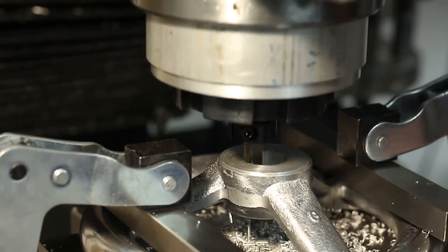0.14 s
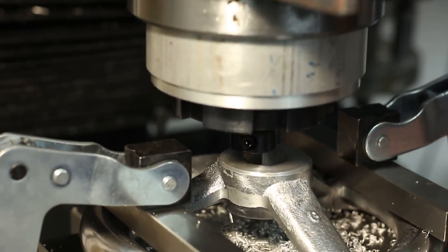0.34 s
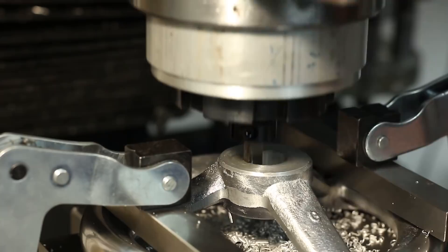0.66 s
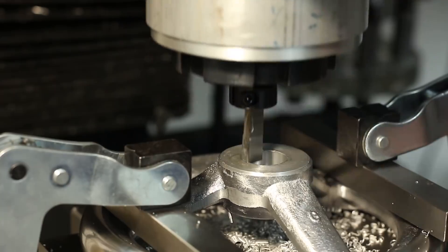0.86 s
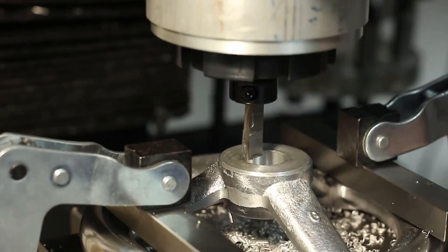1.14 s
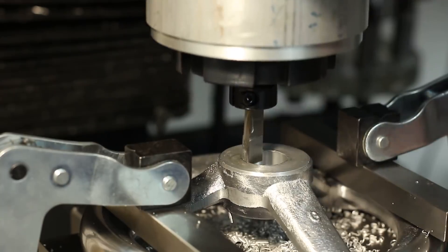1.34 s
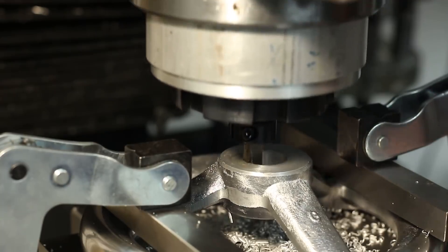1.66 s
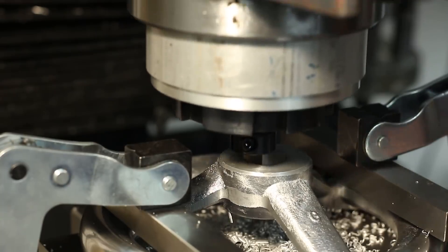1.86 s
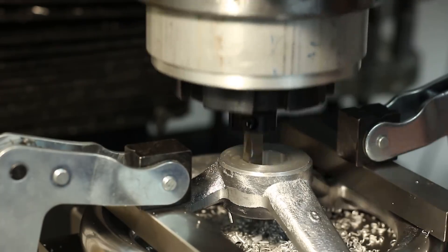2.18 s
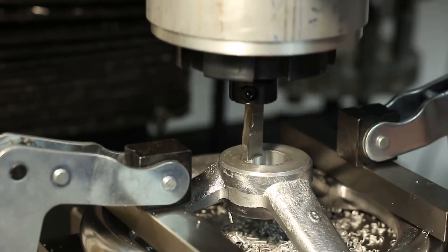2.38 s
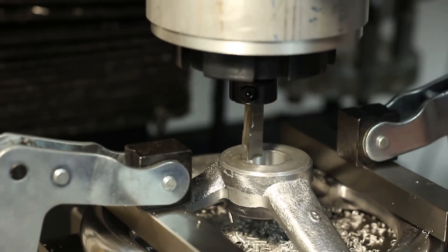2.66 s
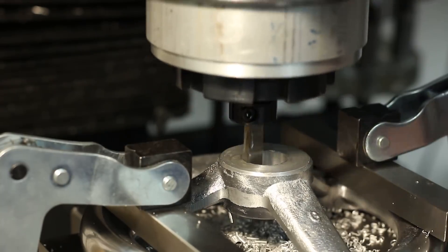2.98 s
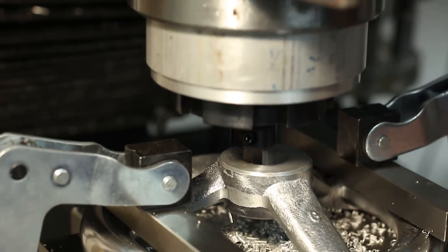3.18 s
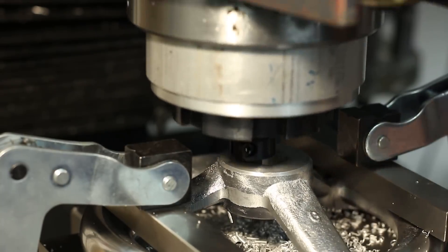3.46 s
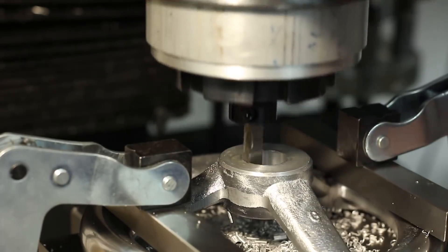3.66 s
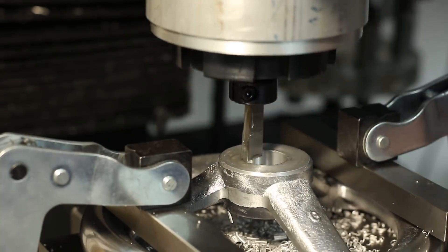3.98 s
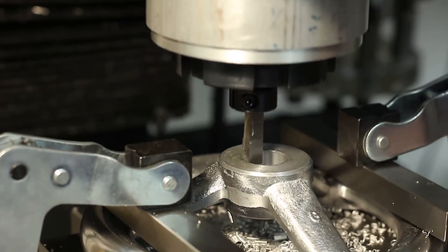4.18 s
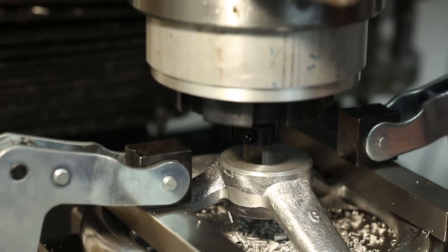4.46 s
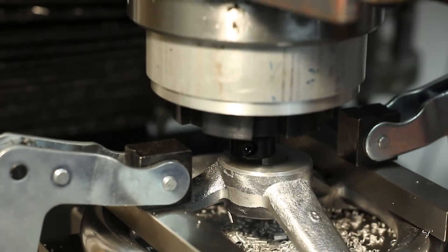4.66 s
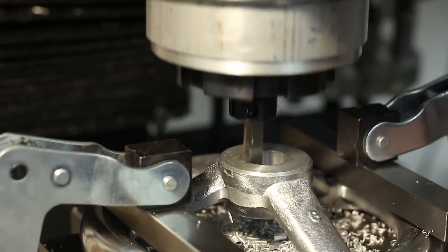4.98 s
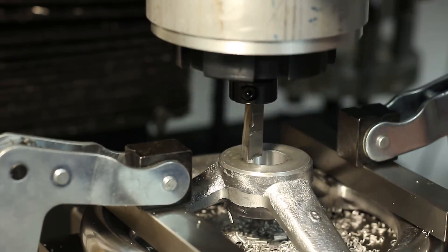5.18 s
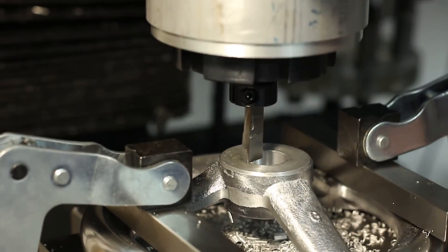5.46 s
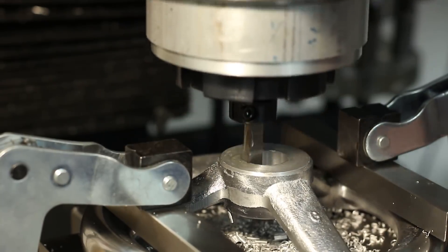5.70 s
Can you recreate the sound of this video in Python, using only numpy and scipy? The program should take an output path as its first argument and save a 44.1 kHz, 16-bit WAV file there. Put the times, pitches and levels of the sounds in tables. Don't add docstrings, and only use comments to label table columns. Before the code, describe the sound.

Close steel knocks come in repeated groups as a cutter bites, turns and springs free, joined by faint high metallic sliding and tiny chip ticks.

```python
import sys
import numpy as np
from scipy import signal
from scipy.fft import rfft, irfft, next_fast_len
from scipy.io import wavfile
from scipy.ndimage import uniform_filter1d, map_coordinates

SR = 44100
rng = np.random.default_rng(int(sys.argv[2]) if len(sys.argv) > 2 else 0)


def field_ratio(decibels):
    return 10 ** (np.asarray(decibels, dtype=float) / 20)


def store_pcm(level_fs):
    pcm = np.round(np.clip(level_fs, -1, 1) * 32767).astype(np.int16)
    wavfile.write(sys.argv[1], SR, np.atleast_2d(pcm).T)


N = 257087
SPAN = 2 ** 14
TOP_HZ = 15830

# full_speed_s, effort_db, speeding_up_s, slowing_down_s
FREE_STROKES = [
    (0.13, -53.5, 0.43, 0.2),
    (1.645, -54.5, 0.31, 0.27),
    (3.15, -54.5, 0.33, 0.32),
    (4.43, -50.5, 0.21, 0.24),
    (5.84, -56, 0.26, 0.22),
]
CUTTING_STROKES = [
    (0.8, -67.5, 0.15, 0.19),
    (2.27, -67.5, 0.08, 0.14),
    (3.68, -69, 0.11, 0.21),
    (4.98, -63, 0.045, 0.14),
]
# over_effort_db, lost_at_ends_db, bluntness (exponent), lag_s
FREE_LAWS = [(0.46, 25.5, 1.234, 0.0015), (-3, 24.5, 0.81, -0.0031), (-14, 15, 1.3, 0.02),
             (3, 6.5, 1.6, -0.0019)]
CUTTING_LAWS = [(0.6, 3, 1.8, -0.11), (-0.5, 15, 2.1, 0.028), (-1.5, 11, 1.4, -0.099),
                (3.5, 17, 0.73, -0.16)]
# pitch_hz, width_hz, level_db
QUILL_MODES = [(1490, 40, -7), (1930, 130, -8.5), (2680, 66, -9.5), (3910, 89, -3.5), (4150, 24, -3),
               (5000, 180, -9), (5170, 240, -4), (5630, 24.5, -10), (6004, 33, 6), (5570, 41, 0),
               (6750, 58, -10.5), (7570, 191, -7), (8460, 90, -6.5), (8810, 61.3, -6)]
# pitch_hz, level_db
SCRAPE_SPECTRUM = [(300, -40), (600, -8.5), (950, -16), (1150, -22), (2500, -27), (4000, -11.5),
                   (6000, -57), (9000, -14.5), (9800, -43.5)]
# pitch_hz, width_hz
SINGING_MODES = [(6070, 55), (8450, 65)]
# pitch_hz, width_hz, level_db
WHISTLE_MODES = [(4185, 64, -7.5), (7570, 90, -13.5), (7040, 38, -17.5), (610, 68, -17.5), (950, 50, -19),
                 (1416, 34, -16.5), (3770, 150, -12)]
# pitch_hz, width_hz, level_db
RUMBLE_MODES = [(104.7, 4.3, 7), (145, 61, -17), (176, 9.7, 2.5), (233, 35, -8), (312, 51, -15.5)]

# start_s, peak_db, centre_hz
LOW_TICKS = [(0.2318, -42.5, 8450), (0.4323, -36, 8860), (0.6729, -37, 5990), (0.9878, -32.5, 8750),
             (1.2989, -42, 8220), (1.4356, -49.5, 8310), (1.484, -44, 8460), (1.7347, -39.5, 5760),
             (2.1542, -44.5, 6140), (2.728, -53, 5700), (2.9093, -42.5, 7540), (3.3707, -43.5, 8420),
             (4.6329, -38, 6175), (4.6673, -45.5, 8380), (5.4328, -44.5, 7870), (3.568, -44, 8360)]
HIGH_TICKS = [(0.4285, -42.5, 11860), (.575, -39, 11490), (1.8285, -38.5, 14280), (1.829, -41.5, 11970),
              (1.83, -44.5, 10870), (1.897, -54, 11000), (2.455, -38, 13800), (3.2357, -50.5, 12750),
              (3.262, -43, 11600), (3.284, -46.5, 11600), (4.0515, -51.5, 13200), (4.3888, -47.5, 13230),
              (4.4172, -35.5, 13820), (4.4516, -39.5, 13360), (4.5585, -55, 12400), (4.6319, -40.5, 12900),
              (5.1903, -68, 10900), (5.435, -45.5, 14180), (5.8224, -31.5, 13840)]

# start_s, peak_db, place (0 column, 1 table, 2 head), push_ms
FRAME_PUSHES = [(0.479, -46.5, 0.1, 30), (0.576, -22.5, 1.52, 8.2), (0.773, -31.5, 1.13, 17.6),
                (0.993, -18, 1.63, 15), (1.16, -40, 2.66, 4.1), (1.342, -29, 1.02, 11),
                (1.364, -24, 1.12, 9.1), (2.059, -27, 1.04, 7.5), (2.188, -28.5, 1.44, 71),
                (2.457, -21.5, 1.46, 12), (2.687, -39.5, 1.7, 7.3), (2.792, -33, 0.94, 3.4),
                (2.813, -23.5, 1.26, 11.4), (3.112, -43, .45, 17), (3.372, -60, 0.046, 12),
                (3.482, -20, 1.6, 17.5), (3.887, -17.5, 1.57, 13.6), (4.03, -33, 2.16, 12),
                (4.087, -35.5, .05, 7.9), (4.121, -27, 1.02, 22), (4.284, -46, 0.45, 12),
                (4.412, -49, 0.18, 25), (4.671, -42, 0.08, 10.5), (4.806, -22, 1.26, 9.8),
                (4.852, -22, 2.28, 14), (5.183, -20.5, 1.73, 14), (5.42, -29.5, 0.96, 42),
                (5.484, -30.5, 1.44, 5.8), (5.511, -27.5, 0.89, 7.2), (5.766, -45, 0.18, 13)]
# pitch_hz, level_db, t60_s
COLUMN_MODES = [(33.5, -19.5, 0.94), (63.6, -18.5, 0.34), (101.84, 3.5, 0.3), (108, -4, 0.72),
                (147.7, 1, 0.39)]
TABLE_MODES = [(186.2, 4, 0.23), (200.6, -14.5, 0.56), (225.4, -3.5, 0.18)]
HEAD_MODES = [(264, -0.5, 0.11), (311.5, -9.5, 0.25), (358, 4, 0.096), (428, -7, 0.21), (470.5, -22, 0.44),
              (549, -14.5, 0.08), (642, -24, .12), (686.4, -24.5, 0.083)]
REACH_DB = 8
# pitch_hz, level_db (per Hz)
COVER_SPECTRUM = [(60, -64), (120, -29), (200, -4), (300, 7), (420, 5.5), (520, -3), (700, -36.5),
                  (1500, -120)]

# start_s, peak_db, bright_share_db, rattle_ms, loudest_mode_hz
CUTTER_BITES = [
    (0.572, -4.5, -10.5, 11.7, 3020),
    (2.0575, -10, -21.5, 13.6, 1815),
    (3.4797, -9, -23, 11.2, 3040),
    (4.8053, -20.5, -25.5, 12, 1634),
    (4.812, -20, -22, 6.8, 1580),
    (5.179, -16, -17, 30, 1800),
    (5.19, -7, -12.5, 5.5, 1800),
]
STROKE_CLUNKS = [
    (0.992, -20, -14.5, 11, 1720),
    (2.455, -18.5, -17, 9.4, 1140),
    (3.884, -15.5, -11, 8.7, 1505),
    (4.84, -26.5, -7.5, 9.5, 1120),
]
CUTTER_RELEASES = [
    (1.3555, -12.5, -20.5, 9.4, 2920),
    (2.8085, -12, -19.5, 8.7, 2800),
    (4.1215, -19.5, -26, 14, 2740),
    (5.505, -16.5, -29, 7.6, 2800),
]
SOFT_TAPS = [
    (0.7505, -37.5, -20, 29, 1130),
    (2.55, -41, -30, 14, 1400),
    (2.182, -33, -12, 7.2, 1130),
    (2.514, -32, -29, 16, 1340),
    (4.043, -30.5, -21, 11, 1800),
    (5.472, -40.5, 7.5, 24, 1810),
]
CRISP_TAPS = [
    (1.155, -31, -30, 7.2, 3900),
    (2.676, -42.5, -21.5, 16, 2700),
    (3.371, -50.5, -10, 6.2, 3500),
    (4.0245, -27.5, -14, 10, 4100),
    (4.051, -33, -7, 8.9, 4780),
    (5.394, -42, -48, 20, 4100),
    (5.431, -40.5, -1, 14, 3000),
]
# start_s, peak_db, swell_ms, loudest_mode_hz
BACKLASH = [
    (.535, -38.5, 77, 3020),
    (0.954, -41.5, 32.5, 1550),
    (1.325, -33.5, 15.7, 5950),
    (2.031, -48.5, 23.6, 6080),
    (2.429, -36.5, 47, 5700),
    (2.776, -35, 13, 3970),
    (3.449, -35.5, 79, 1920),
    (3.856, -34.5, 41, 2160),
    (5.152, -36, 30, 2970),
]
# after_touch_ms, level_db, pitch_hz, cycles_to_peak
BITE_KNOCKS = [(.1, -12, 970, 0.46), (1.2, -3.5, 3100, 0.58), (3, -7, 1600, 0.35), (4.8, -10.5, 3050, 1.1),
               (5, -14, 6100, 2.1), (6.6, -10.5, 2200, 0.86), (8.4, -10.5, 4500, 4.5),
               (10.2, -11.5, 2700, 1.5), (12.5, -15, 1400, 0.38)]
CLUNK_KNOCKS = [(.6, -8.5, 3200, 0.66), (2.4, -2.5, 2870, 0.85), (3.8, -8, 1520, 1.22), (5.4, -8, 4040, 3),
                (7.2, -9, 1030, 0.73)]
RELEASE_KNOCKS = [(.7, -6, 2750, 0.54), (1.9, -8.5, 1770, 0.38), (3.4, -1.5, 2830, 0.77),
                  (4.8, -6.5, 883, 0.88), (6.4, -7.5, 1750, 1.33), (10.4, -23.5, 1500, 1.2)]
CRISP_KNOCKS = [(0.24, -10.5, 4040, 7.7), (.8, -9, 1570, 1.8), (0.41, -12.5, 3210, 6.7),
                (3.2, -11.5, 2700, 2.5), (5.2, -15, 2600, 3.8)]
SOFT_KNOCKS = [(2, -15, 1090, 4.9)]
# pitch_hz, width_hz, level_db
BITE_MODES = [(688, 38, -2), (1130, 24, 4), (1525, 54, -8), (2120, 15, -6.5), (2365, 20, -11.5),
              (2670, 62, -1), (3093, 62, -2), (3800, 110, -4.5), (4210, 19, -12), (4610, 85, -11),
              (5360, 76, -12), (5760, 110, -14), (6250, 130, -18.5), (6590, 29, -18)]
CLUNK_MODES = [(680, 47, 3), (1147, 31, 7.5), (1526, 39, -0.5), (1400, 50, 6), (2695, 41, -2.5),
               (3610, 19, -23), (4160, 30, -18), (5300, 77, -27), (5700, 130, -23), (7500, 188, -36)]
RELEASE_MODES = [(687, 130, -9), (915, 140, 0.5), (1150, 48, 3.5), (1580, 20, 1.5), (2015, 29, -11),
                 (2330, 15, -3), (2367, 35, -6), (2634, 61, 6), (2990, 61, -3), (3270, 65, 1),
                 (4100, 37, -17), (5740, 210, 8)]
# pitch_hz, level_db (per Hz)
BLOW_SPECTRUM = [(300, -19.5), (450, -1.5), (1600, 1), (3000, -1), (4100, 1), (6300, -10.5), (8800, -19),
                 (9800, -34.5), (14000, -52)]

# start_s, level_db, first_mode_hz, t60_s
HOUSING_BOOMS = [(0.579, -33, 301, .2), (.994, -21.5, 356.7, .17), (2.06, -27, 284.2, .2),
                 (2.456, -24.5, 355.3, .17), (2.679, -45.5, 342, .15), (3.485, -30, 328.7, .2),
                 (3.885, -21.5, 354, .17), (4.026, -47, 380, .12), (4.82, -29.5, 343, .15),
                 (4.845, -29, 368.4, .25), (5.19, -39, 355.7, .17), (5.395, -47, 354, .15),
                 (5.508, -30.5, 200, .2)]
# pitch_ratio (to the first mode), level_db
HOUSING_MODES = [(1.001, 0.2), (1.1, -5), (0.97, -6.5), (1.5, -14.5)]

# peak_s, level_db, swell_s, fade_s
BINDINGS = [
    (1.71, -52, .03, 0.045),
    (3.17, -60.5, 0.11, 0.12),
]
# pitch_hz, width_hz, level_db
GROAN_MODE = [(1339, 110, 0)]

# peak_s, level_db, swell_s, fade_s
CHIP_FIZZ = [
    (3.275, -55.5, 0.06, 0.033),
    (4.42, -51, 0.023, 0.071),
    (4.644, -65, .03, 0.053),
    (5.83, -55.5, 0.027, .05),
]
# over_effort_db, lost_at_ends_db, bluntness (exponent), lag_s
CRUSH_LAW = (.1, 24, 0.76, 0.0012)

# pitch_hz, t60_s
SHOP_DECAY = [(300, 0.28), (1100, 0.26), (3000, 0.26), (8000, 0.18)]
# pitch_hz, level_db (per Hz)
ROOM_SPECTRUM = [(20, -28.5), (36, -2.5), (55, -7.5), (190, -2.5), (300, -33.5), (430, -17.5), (900, -17),
                 (1700, -29), (3000, -30.5), (5800, -47.5), (15800, -49)]
# pitch_hz, level_db
SIDE_SPECTRUM = [(100, -47.5), (500, -30), (1500, -27.5), (4000, -21.5), (9000, -13), (15000, -14.5)]
# pitch_hz, level_db
PORT_SPECTRUM = [(30, -66.5), (100, -72), (300, -79), (1000, -83.5), (4000, -83), (9000, -86.5),
                 (15000, -89.5)]


def unit(x):
    return x / np.sqrt(np.mean(x ** 2) + 1e-20)


def along(points, hz):
    f, v = np.transpose(points)
    return np.interp(np.log(hz + 1), np.log(f + 1), v)


def wobble(rate):
    coarse = np.arange(0, N + 16, 16)
    knots = rng.standard_normal(int(N * rate / SR) + 4)
    return np.interp(np.arange(N), coarse, map_coordinates(knots, [coarse * rate / SR]))


def filtered(x, response):
    m = next_fast_len(x.shape[-1] + SR // 8)
    spectrum = rfft(x, m) * response(np.fft.rfftfreq(m, 1 / SR))
    return irfft(spectrum, m)[..., :x.shape[-1]]


def modes(peaks, f):
    total = 0
    for k, (c, w, db) in enumerate(peaks):
        total = total + (-1) ** k * field_ratio(db) * 1j * f * w / (c * c - f * f + 1j * f * w)
    return total


def causal(gain):
    cepstrum = irfft(np.log(gain + 1e-6))
    cepstrum[1:len(cepstrum) // 2] *= 2
    cepstrum[len(cepstrum) // 2 + 1:] = 0
    return np.exp(rfft(cepstrum))


def noise(response):
    return unit(filtered(rng.standard_normal(N), response))


def add(track, s, sound):
    part = track[round(s * SR):][:len(sound)]
    part += sound[:len(part)]


def shop(x, wet_db):
    hz, t, z = signal.stft(rng.standard_normal(len(x)), SR, nperseg=256)
    decay = field_ratio(-60 * t / along(SHOP_DECAY, hz)[:, None])
    tail = signal.istft(z * decay, SR, nperseg=256)[1]
    tail = np.pad(tail / np.linalg.norm(tail), (130, 0))
    return field_ratio(wet_db) * signal.fftconvolve(x, tail)[:len(x)]


def follow(strokes, over_db, lost_db, bluntness, lag):
    s, db, rise, fall = np.transpose(strokes)[:, :, None]
    late = np.arange(N) / SR - s - lag
    away = np.abs(late / np.where(late < 0, rise, fall))
    return field_ratio(db + over_db - lost_db * away ** bluntness).sum(axis=0)


def room_tone():
    return field_ratio(-65.5) * noise(lambda f: field_ratio(along(ROOM_SPECTRUM, f)))


def slide():
    scrape, *singing, rumble = (follow(FREE_STROKES, *free) + follow(CUTTING_STROKES, *cut)
                                for free, cut in zip(FREE_LAWS, CUTTING_LAWS))
    grain = field_ratio(0.42 * wobble(60) + 2.8 * wobble(400))
    body = unit(filtered(grain * rng.standard_normal(N),
                         lambda f: modes(QUILL_MODES, f) + field_ratio(along(SCRAPE_SPECTRUM, f))))
    songs = np.zeros(N)
    for (hz, width), level in zip(SINGING_MODES, singing):
        fits = field_ratio(2.5 * wobble(27) + 1.5 * wobble(4.6))
        songs += level * fits * noise(lambda f: modes([(hz, width, 0)], f) ** 2)
    whistles = np.zeros(N)
    for hz, width, db in WHISTLE_MODES:
        whistles += field_ratio(db + 2.2 * wobble(35)) * noise(lambda f: modes([(hz, width, 0)], f) ** 2)
    shudder = (rumble + field_ratio(-69)) * field_ratio(2.5 * wobble(15))
    frame = shudder * noise(lambda f: modes(RUMBLE_MODES, f))
    return field_ratio(3.5) * scrape * (body + whistles) + field_ratio(4.0) * songs + frame


def ticks():
    track, t = np.zeros(N), np.arange(SPAN // 4) / SR
    kinds = [(LOW_TICKS, 14, -8, .3, 18), (HIGH_TICKS, 3, -1.5, .29, 25)]
    for rows, quill_db, air_db, spread_octaves, t60_ms in kinds:
        for s, db, hz in rows:
            octaves = spread_octaves * np.append(0, rng.uniform(-1, .15, size=4))
            tones = np.minimum(hz * 2 ** octaves, 14550)
            ring = np.sin(2 * np.pi * tones[:, None] * t).T @ field_ratio([-2.0, -32.5, -16, -11.5, -15.0])
            ring *= field_ratio(-60 * t / (t60_ms / 1000))
            click = 0.21 * np.diff(rng.standard_normal(len(t) + 1)) * field_ratio(-60 * t / 0.045)
            tick = (ring + field_ratio(air_db) * click) * np.minimum(t / 0.00052, 1)
            tick += field_ratio(quill_db) * filtered(click, lambda f: modes(QUILL_MODES, f))
            add(track, s - .001, field_ratio(db) * (tick + shop(tick, wet_db=-8.0)) / np.abs(tick).max())
    return track


def thuds():
    track, t = np.zeros(N), np.arange(3 * SPAN // 4) / SR
    for s, db, place, ms in FRAME_PUSHES:
        ring, parts_db = np.zeros(len(t)), -REACH_DB * np.abs(np.arange(3) - place)
        for part, part_db, flutter_db in zip((COLUMN_MODES, TABLE_MODES, HEAD_MODES), parts_db, (1, 1, 3)):
            for hz, level, t60 in part:
                turn, smear, detune = rng.random(), rng.normal(0, 1.2), rng.normal(1, .012)
                knots = np.linspace(0, t[-1], num=14)
                flutter = flutter_db * np.interp(t, knots, rng.standard_normal(size=14))
                envelope = field_ratio(part_db + level + smear + flutter - 60 * t / t60)
                ring += envelope * np.sin(2 * np.pi * (hz * detune * t + turn))
        ring *= np.tanh(t / (max(ms, 1) / 1000))
        add(track, s - .002, field_ratio(db - 0.5) * (ring + shop(ring, wet_db=-6.0)))
    return track


def covers():
    place, t60_s = 2.02, 0.33
    shake, t = np.zeros(N), np.arange(SPAN) / SR
    for s, db, push_place, ms in FRAME_PUSHES:
        reach_db = -REACH_DB * abs(place - push_place)
        add(shake, s, field_ratio(db + reach_db - 60 * t / t60_s) * np.tanh(1000 * t / max(ms, 1)))
    return field_ratio(-10) * shake * noise(lambda f: field_ratio(along(COVER_SPECTRUM, f)))


def chatter(rows, t):
    ms, db, hz, cycles = np.transpose(rows)[:, :, None]
    chance = rng.standard_normal((len(rows), 2, 1))
    turns = np.maximum(t[:2048] - ms / 1000, 0) * hz * (1 + .03 * chance[:, 0])
    rise = turns / np.maximum(cycles, .3)
    bursts = field_ratio(db + 1.5 * chance[:, 1]) * rise * np.exp(1 - rise) * np.sin(2 * np.pi * turns)
    return np.pad(bursts.sum(axis=0), (0, len(t) - 2048))


def struck_steel(run, steel):
    free = [(hz * rng.normal(1, .008), 0.8 * width, db + rng.normal(0, 3)) for hz, width, db in steel]
    return run + field_ratio(-6) * filtered(run, lambda f: modes(free, f))


def contact(swell, steel, accent_db, low_db, bright_db, accent_hz):
    clumps = field_ratio(0.97 * unit(uniform_filter1d(rng.standard_normal(len(swell)), size=50)))
    rattle = swell * clumps * rng.standard_normal(len(swell))
    blow = np.linalg.norm(rattle) * (np.arange(len(swell)) == np.argmax(swell))
    struck = [(hz, width, level + rng.normal(0, 1.5)) for hz, width, level in steel]
    widened = [(hz, 2.4 * width, level) for hz, width, level in struck]
    tilt = [(1200, low_db + 15.5), (3000, 0.0081), (6500, bright_db + 15.5)]  # (Hz, dB)

    def colour(f):
        return causal(field_ratio(along(BLOW_SPECTRUM, f) + along(tilt, f)))

    def accent(f):
        return modes([(accent_hz, 220, accent_db)], f)

    ring = filtered(rattle, lambda f: colour(f) * (0.67 + modes(struck, f) + accent(f)))
    tail = filtered(blow, lambda f: colour(f) * (.45 + modes(widened, f) + field_ratio(-7.5) * accent(f)))
    loudest = 3 * np.linalg.norm(ring) / np.linalg.norm(swell)
    return (field_ratio(-1.5) * ring + shop(tail, wet_db=-3.5)) / loudest


def knocks():
    track, t = np.zeros(N), np.arange(SPAN) / SR
    for s, db, ms, hz in BACKLASH:
        swell = (1000 * t / ms) ** 0.88 * (1000 * t < ms)
        lead = contact(swell, BITE_MODES, 0.84, low_db=-2.5, bright_db=-3.5, accent_hz=hz)
        add(track, s, field_ratio(db + 3) * lead)
    # accent_db, low_share_db
    kinds = [(CUTTER_BITES, BITE_MODES, BITE_KNOCKS, -3, -15),
             (SOFT_TAPS, CLUNK_MODES, SOFT_KNOCKS, 14, -1.5),
             (STROKE_CLUNKS, CLUNK_MODES, CLUNK_KNOCKS, 3, -14),
             (CRISP_TAPS, CLUNK_MODES, CRISP_KNOCKS, 9, -7),
             (CUTTER_RELEASES, RELEASE_MODES, RELEASE_KNOCKS, -3, -11)]
    for rows, steel, parts, accent_db, low_db in kinds:
        for s, db, bright_db, ms, hz in rows:
            swell = np.minimum(t / 0.0018, 1) * np.exp(-(1000 * t / max(ms, 2)) ** 2.6)
            run = struck_steel(chatter(parts, t), steel)
            rattle = contact(swell, steel, accent_db, low_db, bright_db, hz)
            add(track, s - .001, field_ratio(db) * (run + rattle))
    return track


def booms():
    track, t = np.zeros(N), np.arange(SPAN) / SR
    ratio, level = np.transpose(HOUSING_MODES)[:, :, None]
    for s, db, hz, t60 in HOUSING_BOOMS:
        flutter = 1.4 * unit(uniform_filter1d(rng.standard_normal((len(ratio), SPAN)), size=900))
        ring = field_ratio(db + level + flutter - 60 * t / t60) * np.sin(2 * np.pi * hz * ratio * t)
        add(track, s, ring.sum(axis=0) * np.tanh(t / 0.0049))
    return track


def groans():
    return follow(BINDINGS, .1, 14.5, 0.77, .001) * noise(lambda f: modes(GROAN_MODE, f) ** 2)


def fizz():
    chip_modes = [(11870, 280, -3.5), (13300, 690, 1.5), (13600, 460, -17.5)]  # (Hz, width Hz, dB)
    clumps = field_ratio(6.5 * wobble(130))
    crushed = filtered(clumps * rng.standard_normal(N), lambda f: modes(chip_modes, f))
    return follow(CHIP_FIZZ, *CRUSH_LAW) * unit(crushed)


def scene():
    mid = room_tone() + slide() + ticks() + thuds() + covers() + knocks() + booms() + groans() + fizz()
    smear = rng.standard_normal(300) * field_ratio(-40 * np.arange(300) / 300)
    smeared = signal.fftconvolve(mid, smear / np.linalg.norm(smear))[:N]
    side = filtered(smeared, lambda f: field_ratio(along(SIDE_SPECTRUM, f)))
    ports = filtered(rng.standard_normal((2, N)), lambda f: field_ratio(along(PORT_SPECTRUM, f) + 21.5))
    return [mid + side, mid - side] + ports


def top_cut(x):
    return signal.sosfilt(signal.butter(12, 16990, fs=SR, output="sos"), x)


def record(dry):
    mix = filtered(dry, lambda f: f < TOP_HZ)
    return top_cut(mix)


dry = scene()
out = record(dry)
store_pcm(out)
```